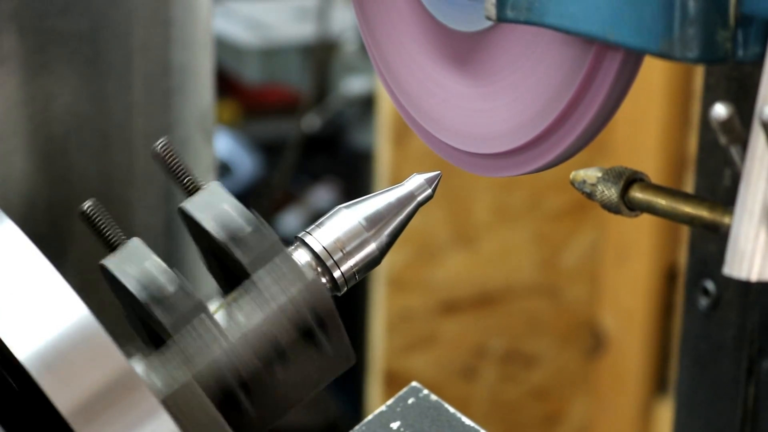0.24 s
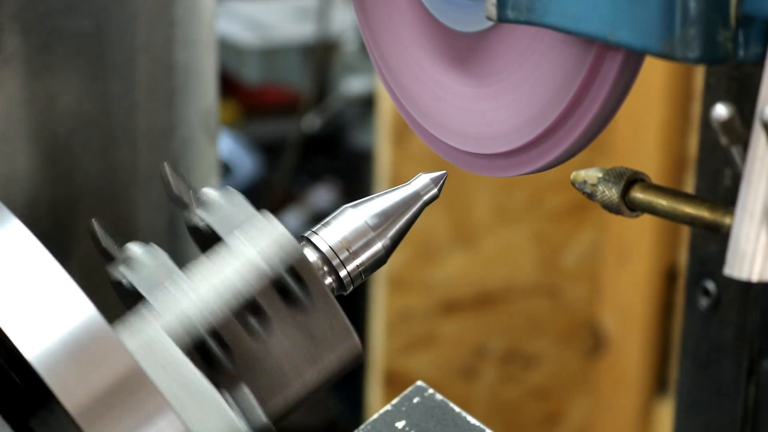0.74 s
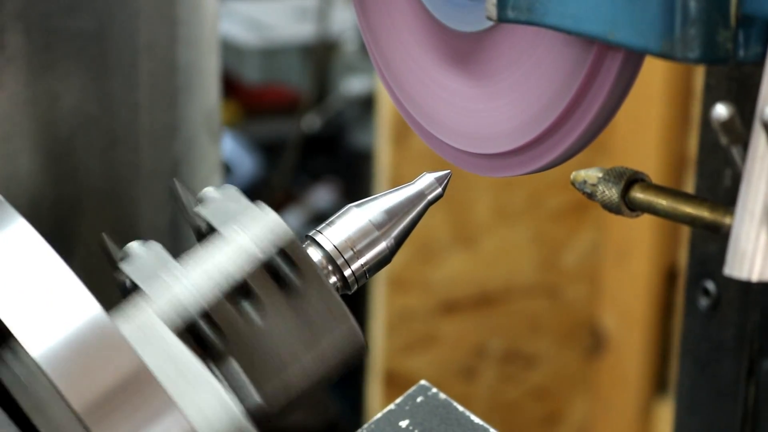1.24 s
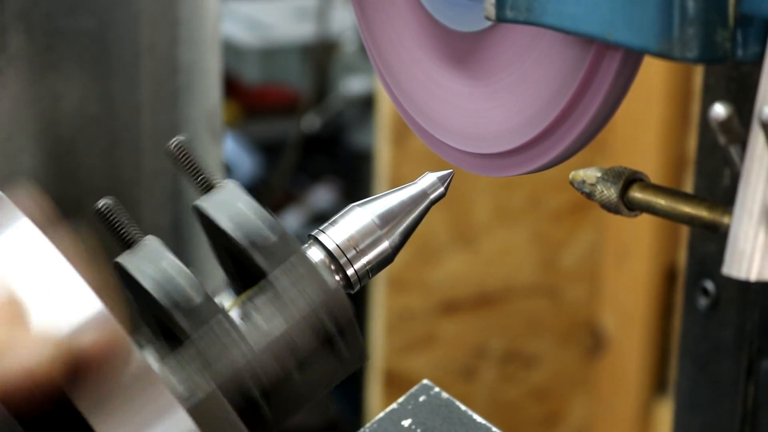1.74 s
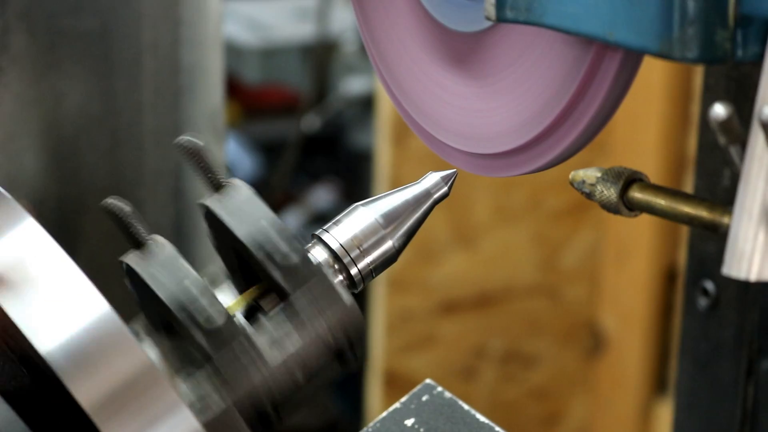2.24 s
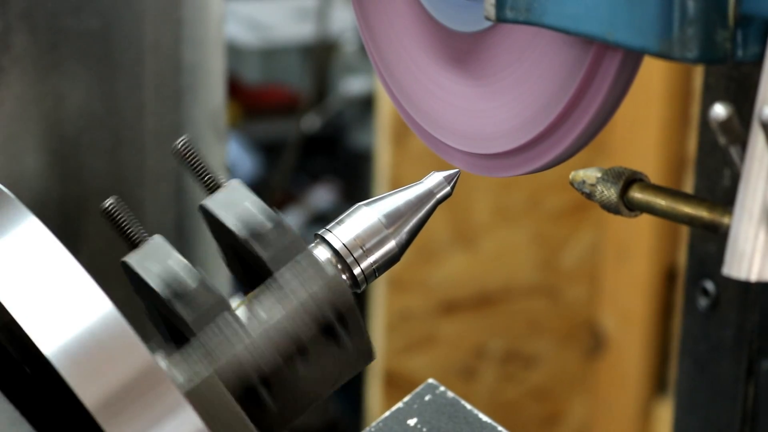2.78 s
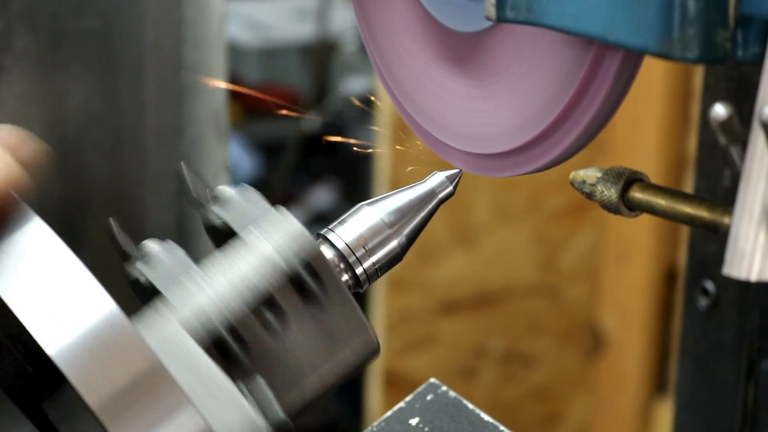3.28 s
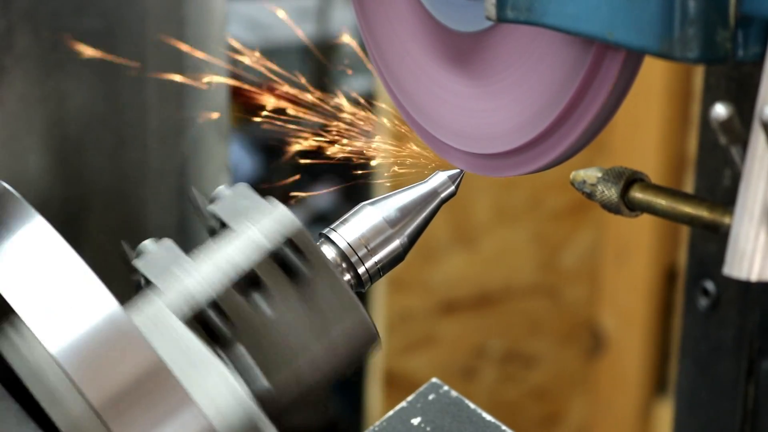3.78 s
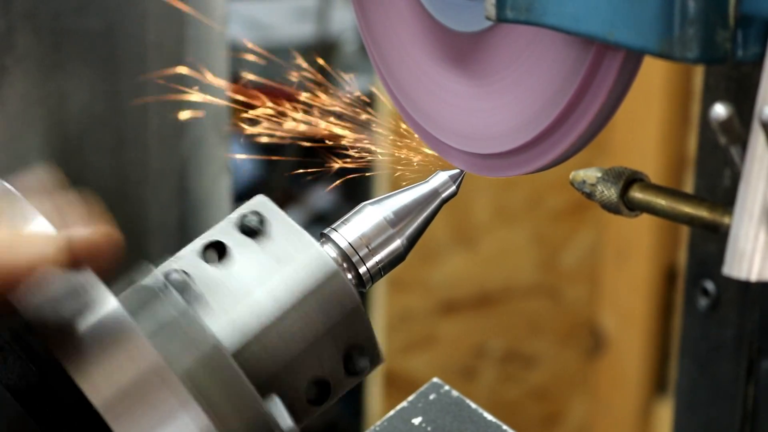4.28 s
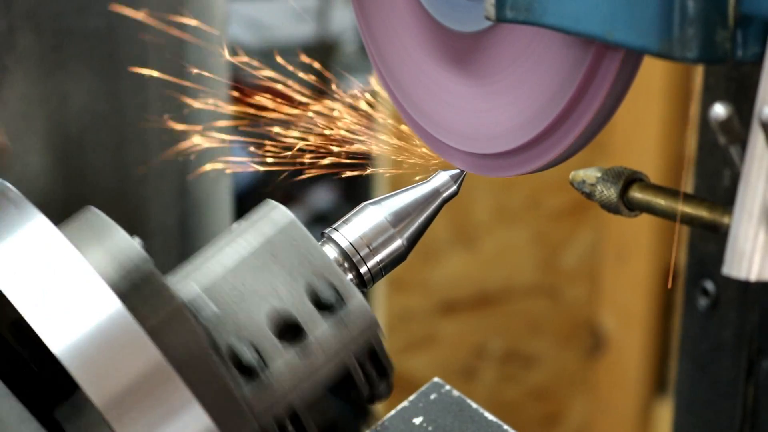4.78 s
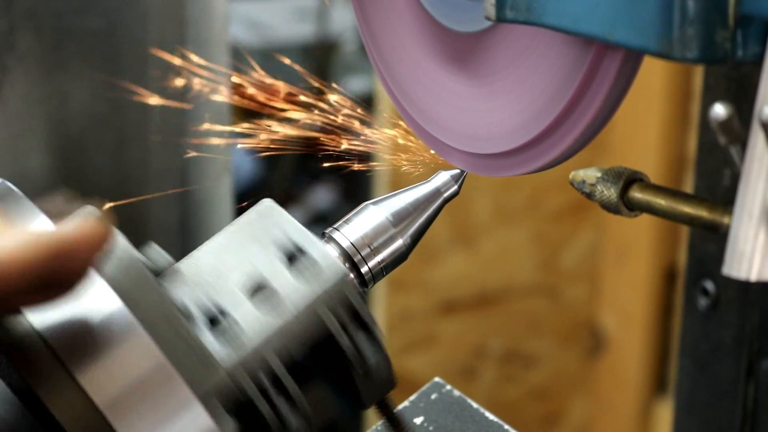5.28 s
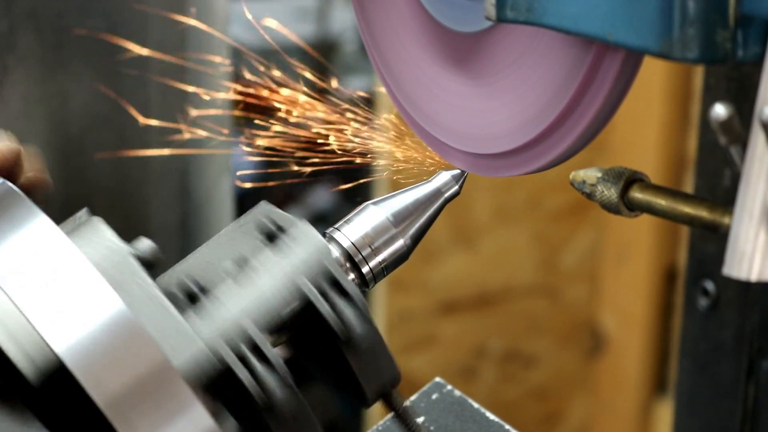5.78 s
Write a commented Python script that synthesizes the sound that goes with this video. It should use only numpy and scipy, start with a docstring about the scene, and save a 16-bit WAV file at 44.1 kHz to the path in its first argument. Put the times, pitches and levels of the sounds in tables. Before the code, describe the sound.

Steady rough machine whine and pulsing hum fill a workshop; halfway through, hand-turned metal meets the spinning wheel with a thin, fizzing, very high scrape.

```python
"""A grinder idles with a worn spindle bearing: balls rolling over the race whine in families of tones,
spaced by the cage and shaft rates, over motor hum and air rush. A hand-turned steel point then meets
the wheel, and the grit hisses once per wheel turn through the high resonances of point and chuck."""
import sys
import numpy as np
from scipy import signal
from scipy.fft import rfft, irfft
from scipy.io import wavfile

SR = 44100
rng = np.random.default_rng(int(sys.argv[2]) if len(sys.argv) > 2 else 0)


def inscribe(sig):
    """Save sig as 16-bit PCM at rate SR to the path in sys.argv[1].

    A 1-D sig is mono; a 2-D sig holds one channel per row.
    Samples are clipped to [-1, 1] before scaling.
    """
    pcm = np.round(np.clip(np.atleast_2d(sig).T, -1, 1) * 32767)
    wavfile.write(sys.argv[1], SR, pcm.astype(np.int16))


N = 265923

SHAFT_HZ, BALLS = 59.89, 12   # fixed
# balls passing a spot on the inner race: (s, passes per s)
PASS = [(0, 407.82), (2.9, 407.83), (3.3, 407.75), (6.03, 407.75)]   # fixed
# the loudest bearing tones, named "multiple of ball pass:multiple of cage rate": (tone, dB rms at rest)
LOUD = [("2:-2", -50), ("2:-1", -42.5), ("2:0", -45), ("2:1", -38.5), ("3:0", -49.5), ("4:-2", -54), ("4:-1", -48), ("4:0", -48), ("4:1", -43), ("4:2", -49),
        ("5:-1", -54.5), ("6:-1", -32), ("6:1", -49), ("7:-1", -36.5), ("7:1", -55), ("8:-1", -48.5), ("8:1", -41), ("10:-1", -52.5), ("11:1", -57.5),
        ("12:-1", -51), ("23:-1", -63)]
FADE_DB, FADE_RATE = 4, 0.58
# uneven rolling spreads a noisy skirt round each family, stronger on high multiples
SKIRT_DB, SKIRT_DB_PER_DECADE, SKIRT_HZ = -29.5, 15, 71
# motor hum: (multiple of shaft rate, dB rms)
HUM = [(1, -63.5), (2, -59.5), (3, -58.5), (7, -40.5)]
# housing panels rung by the vibration: (Hz, width Hz, dB rms)
PANELS = [(283.3, 6.2, -63.5), (298.5, 6.5, -53.5), (660.4, 6.4, -46.5), (947, 9.3, -57), (9600, 680, -53), (10080, 570, -53), (12950, 320, -62), (14400, 320, -59)]
# an unsteady drone, perhaps a pump or fan nearby: (s, dB rms of its 6th and of its 5th harmonic)
DRONE = [(0.0, -35, -37), (0.18, -39, -48), (0.97, -36, -42), (1.02, -27, -33), (1.09, -39, -56), (1.14, -30, -37),
         (1.58, -41, -49), (1.76, -28, -35), (1.85, -40, -54), (2.0, -24.5, -33), (2.1, -37, -49), (2.37, -32, -34),
         (2.4, -43, -53), (2.47, -28, -36), (2.55, -39, -43), (2.62, -25, -37), (2.72, -39, -49), (2.8, -27.5, -42),
         (3.11, -39, -46), (3.26, -33.5, -54), (3.68, -43, -53), (3.74, -37, -40), (3.96, -45, -53), (4.01, -32, -45),
         (4.62, -47, -54), (4.7, -29.5, -42), (4.99, -41, -48), (5.42, -33, -40), (5.76, -38, -50), (6.03, -35, -44)]
AIR = [(40, -105), (90, -81.5), (200, -73), (400, -68.5), (520, -70.5), (620, -64), (780, -59.5), (1000, -65.5), (1400, -66.5), (2100, -68.5), (2700, -66), (3500, -69), (5300, -78.5), (6300, -74), (8000, -82.5), (9900, -83), (11500, -87), (13000, -89), (15500, -95)]   # air rush and workshop: (Hz, dB per Hz)
# rings of the point: (Hz, width Hz, Hz, width Hz), a pair each
RINGS = [(13810, 150, 14180, 340), (14560, 200, 14830, 270), (15340, 220, 15580, 210)]   # fixed
HISS_LOW_HZ, HISS_HIGH_HZ = 10000, 13600   # fixed
# high spots of the wheel: (per turn, depth 0-1, phase in cycles)
RUNOUT = [(1, .45, .46), (2, .12, .4), (3, .22, -.1)]   # fixed
SAME_GRIT = .65   # share of grit that strikes alike on every turn; fixed
CUTOFF_HZ = 15930   # fixed
PANEL_SWAY_DB = 3   # each panel's ring swells and sinks slowly
DRONE_HZ, DRONE_WAVER_RAD, DRONE_WAVER_RATE = 116.46, 0.15, 8.2
DRONE_ORDERS = [6, 5, 4]   # fixed
SLIP_RAD = .18   # each loud tone's phase creeps as the balls slip; fixed
WAVY_DB = -2.5   # part of the skirt that repeats with cage and shaft, over the random part
DRONE_FOURTH_DB = -9   # 4th harmonic under the 5th
# first side tones in step with the centre tone throb once per cage turn, out of step they only waver:
# (s, share in step 0-1 for the 2nd family, for the 4th family)
IN_STEP = [(0, 0, 1), (.3, .2, .6), (.45, .9, .3), (.6, .9, .2), (1.5, .7, .2), (2, .2, .4), (2.5, .9, .5), (3.6, .7, .3), (4, .2, .9), (5.1, .1, .9), (5.5, .5, .4), (6.03, .4, .5)]   # fixed
WAVY_REACH_HZ = 92.5   # faster waves are weaker
HISS_RING_HZ, HISS_RING_WIDTH_HZ, HISS_RING_GAIN = 12200, 200, 0.79   # a ring inside the hiss
# as the balls slip and regroup one tone swells and fades again: (peak s, tone, added dB rms at the peak, length s at half height)
SWELLS = [(0, "6:-1", -27, 0.5), (0, "2:-2", -42, 0.48), (0.035, "4:0", -28, 0.25), (0.092, "8:1", -35, .28), (.36, "7:-1", -25.5, 1.48), (.43, "7:1", -32, 1.22),
          (0.453, "2:0", -28, 1.4), (.48, "4:1", -39, 1.8), (.8, "11:1", -46.5, 1.9), (.9, "23:-1", -57, .4), (.91, "2:1", -34.5, 1.2), (0.915, "4:0", -25, 0.85), (1.15, "4:2", -31.5, 1.2),
          (1.44, "2:0", -34, 0.71), (1.47, "6:-1", -25.5, 0.75), (1.54, "4:-1", -35.5, 1.7), (1.6, "6:1", -30, 2.04), (1.6, "2:-2", -43, 0.56), (1.69, "5:-1", -35.5, 2.5),
          (1.95, "7:1", -25.5, 0.69), (2.05, "10:-1", -47, 0.55), (2.23, "8:-1", -36.5, 1.4), (2.253, "2:-1", -30.5, 2.6), (2.35, "4:0", -23, 1.08), (2.55, "4:2", -38, 0.41),
          (2.63, "4:1", -34, 0.64), (2.8, "3:0", -35, 2.83), (2.8, "6:-1", -23, 0.42), (2.99, "7:-1", -34, 1.2), (3.25, "11:1", -48, 0.27), (3.275, "8:1", -33, 0.39),
          (3.59, "4:-2", -37, 2), (3.716, "6:-1", -19, 1.28), (3.887, "7:1", -29.5, 2.6), (3.92, "12:-1", -46.5, 0.27), (3.982, "2:0", -31.5, 2.3), (4.11, "4:0", -28.5, 3.25), (4.295, "4:2", -39, 0.95),
          (4.58, "8:1", -35.5, .63), (4.6, "4:1", -40, 1.1), (4.69, "2:-1", -36.5, 0.79), (4.73, "10:-1", -39.5, 0.95), (4.78, "7:-1", -33.5, 0.58), (4.9, "2:-2", -44.5, 2.5),
          (4.988, "12:-1", -49, .4), (5.0, "11:1", -57, .8), (5.03, "5:-1", -36.5, 1), (5.09, "4:-1", -50, 2.9), (5.09, "6:1", -28, 2.2), (5.13, "8:-1", -32.5, 1.2), (6.03, "7:1", -29.5, 1)]
# every family has weaker tones up to three cage steps to each side, the first steps strongest:
# (dB rms one step below, one step above, of the others) for multiples 2, 3, 4 .. of ball pass
WEAK_LEVEL = [(-46, -46, -45.5), (-56, -45.5, -54), (-48, -48, -48), (-50, -49, -54.5), (-48, -48, -53.5), (-47, -47, -48.5), (-48, -48, -53), (-47.5, -48, -67),
              (-51, -50, -68), (-55, -49, -57), (-48, -55, -57.5), (-69, -53.5, -67), (-60, -57, -73.5), (-55, -51.5, -63), (-62, -61, -66), (-64, -68, -67),
              (-67, -67.5, -69), (-67.5, -70, -75), (-70, -66, -74), (-71, -71, -72), (-64, -67.5, -72), (-66.5, -63, -70), (-52, -69, -66), (-68, -72, -69)]
# a few tones also step by the shaft rate: (multiple of ball pass, of cage rate, of shaft rate, dB rms)
SHAFT_TONES = [(2, 4, 0, -45), (2, 5, 0, -49), (2, 3, 1, -44), (2, 5, -6, -43), (3, -1, 2, -48), (4, 0, 1, -46), (4, 4, -4, -48),
               (6, -1, -8, -48), (6, -1, -4, -50), (6, -1, -2, -47), (6, -1, 2, -43), (6, 1, 2, -43), (8, -1, 2, -46),
               (9, -2, -2, -54), (9, 1, -2, -52), (10, -3, 2, -51), (16, -1, 1, -56), (17, -1, 1, -56), (23, 4, -8, -58), (24, 2, -8, -59)]   # fixed
HOP = 8   # samples per step of a family's envelope; fixed
# grinding contact, with a first brush and a brief lift: (s, broad hiss dB, ringing of the point dB)
CONTACT = [(2.9, -66, -66), (2.94, -56, -64), (3.0, -65, -70), (3.17, -63, -63), (3.23, -63, -59), (3.28, -61, -59), (3.55, -48, -57), (4.0, -52, -54), (4.5, -48, -51), (5.2, -46.5, -51), (5.42, -54, -52), (5.66, -54, -55), (5.7, -64, -69), (5.76, -54, -55), (5.9, -46, -50), (6.03, -55, -53)]
# the hand turns the chuck: (s, turns)
CHUCK = [(2.83, 0), (3.39, 1), (3.95, 2), (4.52, 3), (5.11, 4), (5.66, 5), (6.21, 6)]   # fixed
# each side of the point sounds its rings alike on every turn: (share of a turn, dB of each ring)
SIDES = [(0.01, 10, 2, -2.5), (.12, 2.5, -.5, -3), (.24, -.5, -.5, -3), (.36, 3, 6, 4), (.44, .5, 2, 1.5), (.5, -.5, -2.5, -5),
         (.64, -2.5, -1.5, -4), (.74, 2.5, 4.5, 3.5), (.8, -.5, 1.5, -2.5), (.89, 3, 3.5, -.5), (.94, .5, 1.5, -1.5)]
BITE_DB, BITE_RATE = 2.2, 14.0   # hiss and rings each bite unevenly
UNHEARD_DB = -66.5   # fixed
WEAK_SCATTER_DB = 2.5
DRONE_FIFTH_DB = None
DRONE_FLUTTER_DB, DRONE_FLUTTER_RATE = 2, 6.7


def amp(db):
    """dB to gain."""
    return 10 ** (np.asarray(db) / 20)


def rms_one(x):
    """Scale to rms 1."""
    return x / np.sqrt(np.mean(np.abs(x) ** 2) + 1e-20)


def in_time(rows, before=None):
    """Columns of a curve table at every sample."""
    s, *columns = np.transpose(rows)
    return [np.interp(np.arange(N) / SR, s, c, left=before) for c in columns]


def drift(rate, hop=1):
    """Slow chance: noise at every 64th sample through a double one-pole low-pass; spread 1."""
    r = np.exp(-128 * np.pi * rate / SR)  # fixed
    slow = signal.lfilter([1], [1, -2 * r, r * r], rng.standard_normal(N // 64 + 1002))[1000:]  # fixed
    return np.interp(np.arange(0, N, hop) / 64, np.arange(len(slow)), rms_one(slow - slow.mean()))  # fixed


def resonate(x, hz, width_hz):
    """One resonance, gain 1 on top."""
    r = np.exp(-np.pi * width_hz / SR)
    return signal.lfilter([(1 - r * r) / 2, 0, -(1 - r * r) / 2], [1, -2 * r * np.cos(2 * np.pi * hz / SR), r * r], x)


def bearing():
    """Each tone is a sum of ball-pass, cage and shaft rates; a family shares one roughness."""
    t = np.arange(N) / SR
    shaft, passes = SHAFT_HZ * t, np.cumsum(in_time(PASS)[0]) / SR
    cage = shaft - passes / BALLS      # the race gains on the cage by one ball gap per pass
    lag = {k: (1 - share[::HOP]) * np.pi / 2 for k, share in zip((2, 4), in_time(IN_STEP))}   # fixed
    # each family has a phase of its own and throbs at its own point of the cage turn
    start = {k: rng.uniform(0, 2 * np.pi, size=2) for k in sorted({multiples(tone)[0] for tone, db in LOUD})}
    tones = [(k, c, 0, swelling(tone, db, t[::HOP]),
              start[k] @ [1, c] + lag.get(k, 0) * (abs(c) == 1) + SLIP_RAD * drift(FADE_RATE / 2, HOP))
             for tone, db in LOUD for k, c in [multiples(tone)]]
    tones += [(k, c, s, amp(db + FADE_DB * np.minimum(drift(FADE_RATE, HOP), 1)), rng.uniform(0, 2 * np.pi))
              for k, c, s, db in weak_tones()]
    families, out = {}, np.zeros(N)
    for k, c, s, height, phase in tones:
        families[k] = families.get(k, 0) + height * np.exp(1j * (2 * np.pi * (c * cage + s * shaft)[::HOP] + phase))
    for k, family in families.items():
        skirt = amp(SKIRT_DB + SKIRT_DB_PER_DECADE * np.log10(k)) * np.std(family)
        uneven = drift(SKIRT_HZ, HOP) + amp(WAVY_DB) * waviness(cage, shaft)
        envelope = np.interp(t, t[::HOP], family + skirt * uneven * np.exp(2j * np.pi * rng.random()))
        out += np.sqrt(2) * np.real(envelope * np.exp(2j * np.pi * k * passes))
    return out


def motor():
    """Steady hum on multiples of the shaft rate."""
    turn = 2 * np.pi * SHAFT_HZ * np.arange(N) / SR
    return sum(np.sqrt(2) * amp(db) * np.sin(round(k) * turn + rng.uniform(0, 2 * np.pi)) for k, db in HUM)


def housing():
    """Random vibration rings the panels; twice through each keeps the valleys dark."""
    return sum(amp(db) * rms_one(resonate(resonate(rng.standard_normal(N), hz, width_hz), hz, width_hz))
               * amp(PANEL_SWAY_DB * drift(FADE_RATE)) for hz, width_hz, db in PANELS)


def air():
    """Smooth noise with the given level per Hz."""
    hz = np.maximum(np.fft.rfftfreq(N, 1 / SR), 1)
    table = np.array(AIR)
    per_hz = amp(np.interp(np.log(hz), np.log(table[:, 0]), table[:, 1]))
    return irfft(rfft(rng.standard_normal(N)) * per_hz, N) * np.sqrt(SR / 2)


def grinding():
    """Grit scratches the point, partly alike each turn, harder on the wheel's high spots."""
    turns = SHAFT_HZ * np.arange(N) / SR
    around = round(SR / SHAFT_HZ)
    wheel_face = rng.standard_normal(around)[np.round(turns % 1 * around).astype(int) % around]
    share = np.clip(SAME_GRIT, 0, 1)
    grit = np.sqrt(share) * wheel_face + np.sqrt(1 - share) * rng.standard_normal(N)
    grit = grit * (1 + sum(depth * np.cos(2 * np.pi * (k * turns + phase)) for k, depth, phase in RUNOUT))
    hiss_db, point_db = in_time(CONTACT, before=-90)
    side, *sides_db = np.transpose(SIDES)
    ring_db = [point_db + np.interp(in_time(CHUCK)[0], side, db, period=1) for db in sides_db]
    band = signal.butter(2, [HISS_LOW_HZ, HISS_HIGH_HZ], "band", fs=SR, output="sos")
    ringing = HISS_RING_GAIN * resonate(grit, HISS_RING_HZ, HISS_RING_WIDTH_HZ)
    out = amp(hiss_db + BITE_DB * drift(BITE_RATE)) * rms_one(signal.sosfilt(band, grit) + ringing)
    for db, (hz, width_hz, upper_hz, upper_width_hz) in zip(ring_db, RINGS):
        lower = resonate(resonate(grit, hz, width_hz), hz, width_hz)      # twice: steep flanks
        ring = lower - resonate(resonate(grit, upper_hz, upper_width_hz), upper_hz, upper_width_hz)
        out += amp(db + BITE_DB * drift(BITE_RATE)) * rms_one(ring)
    return out


def drone():
    """An unsteady drone: its harmonics waver in pitch together and flutter in level."""
    angle = 2 * np.pi * DRONE_HZ * np.arange(N) / SR + DRONE_WAVER_RAD * drift(DRONE_WAVER_RATE)
    sixth_db, fifth_db = in_time(DRONE)
    flutter_db = DRONE_FLUTTER_DB * np.minimum(drift(DRONE_FLUTTER_RATE), 1)
    sixth_db, fifth_db = sixth_db + flutter_db, fifth_db + flutter_db
    levels = sixth_db, fifth_db, fifth_db + DRONE_FOURTH_DB
    return sum(np.sqrt(2) * amp(db) * np.sin(k * angle + rng.uniform(0, 2 * np.pi)) for k, db in zip(DRONE_ORDERS, levels))


def waviness(cage, shaft):
    """Wavy races modulate a family at every low sum of cage and shaft rates, each with a chance strength."""
    sums = np.array([(c, s) for s in range(3) for c in range(-4, 5) if s or c > 0])   # fixed
    turns = sums @ [cage[::32], shaft[::32]] + rng.random((len(sums), 1))   # fixed
    hz = sums @ [cage[-1], shaft[-1]] * SR / N
    wave = rng.standard_normal(len(sums)) / (1 + (hz / WAVY_REACH_HZ) ** 2) @ np.cos(2 * np.pi * turns)
    return np.interp(np.arange(0, N, HOP) / 32, np.arange(len(wave)), rms_one(wave))   # fixed


def weak_tones():
    """Rows (ball pass, cage, shaft multiples, dB rms) of all tones that fade at random."""
    loud = {multiples(tone) for tone, db in LOUD}
    grid = [(k, c, 0, {-1: below_db, 1: above_db}.get(c, other_db + WEAK_SCATTER_DB * rng.standard_normal()))
            for k, (below_db, above_db, other_db) in enumerate(WEAK_LEVEL, start=2) for c in range(-3, 4)]   # fixed
    return [row for row in grid if row[:2] not in loud and row[3] > UNHEARD_DB] + SHAFT_TONES


def swelling(tone, rest_db, t):
    """Height of one loud tone: its rest level plus its bell-shaped swells."""
    return amp(rest_db) + sum(amp(db) * 2. ** -(2 * (t - s) / length) ** 2 for s, name, db, length in SWELLS if name == tone)


def multiples(tone):
    """The two whole numbers in a tone's name."""
    return tuple(int(part) for part in tone.split(":"))


def scene():
    """All sources at one microphone."""
    return (bearing() + motor() + housing() + drone() + air() + grinding())[None]


def record(dry):
    """The top is cut steeply."""
    return signal.sosfilt(signal.ellip(12, .5, 70, CUTOFF_HZ - 180, fs=SR, output="sos"), dry)  # fixed


dry = scene()
out = record(dry)
inscribe(out)
```